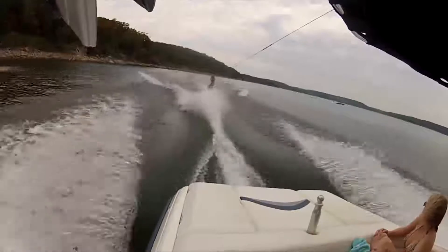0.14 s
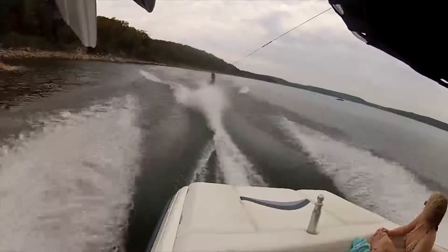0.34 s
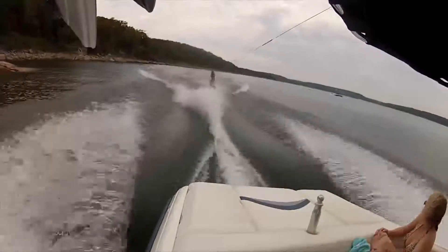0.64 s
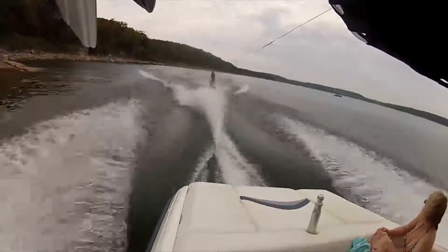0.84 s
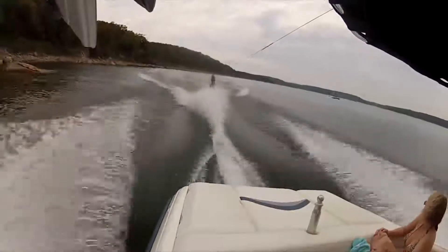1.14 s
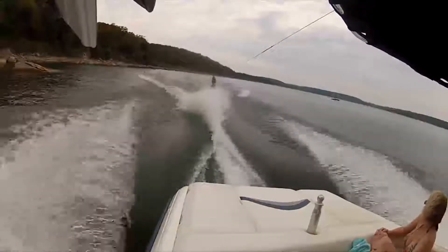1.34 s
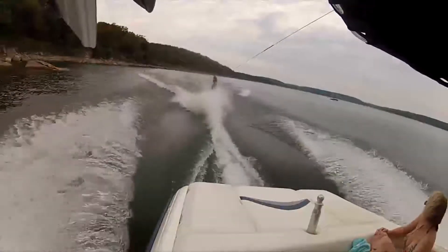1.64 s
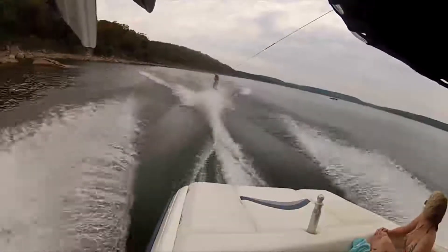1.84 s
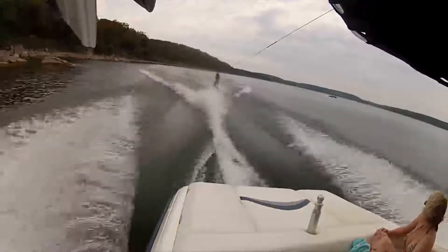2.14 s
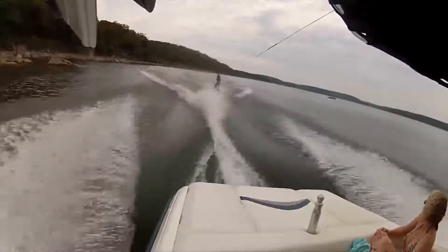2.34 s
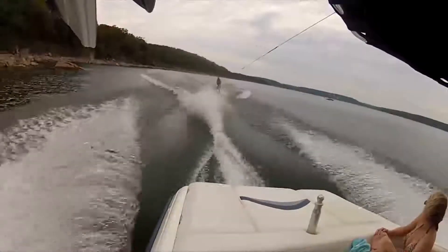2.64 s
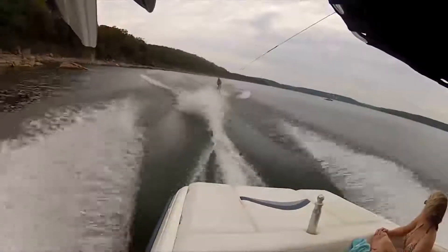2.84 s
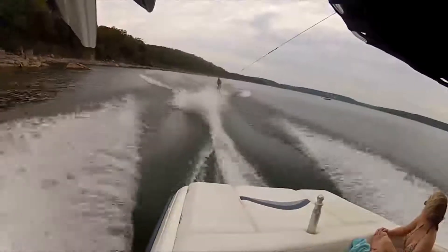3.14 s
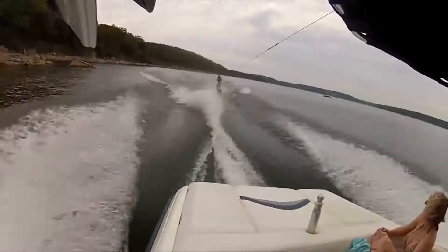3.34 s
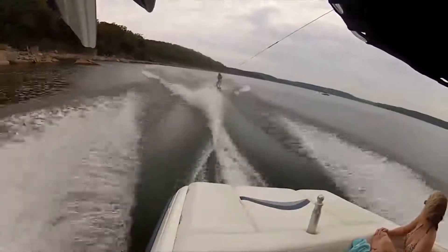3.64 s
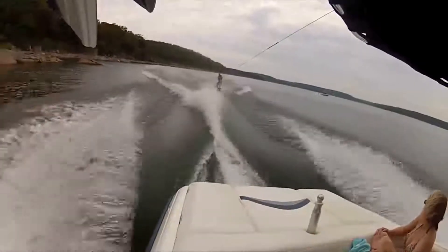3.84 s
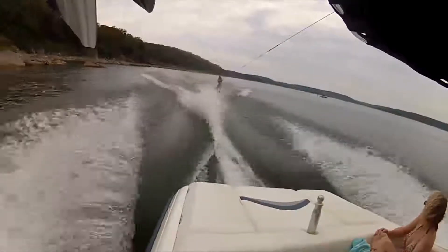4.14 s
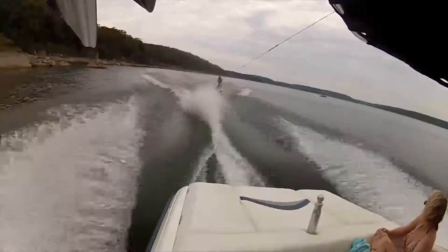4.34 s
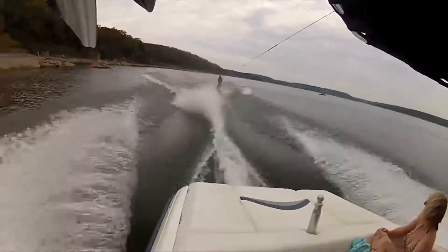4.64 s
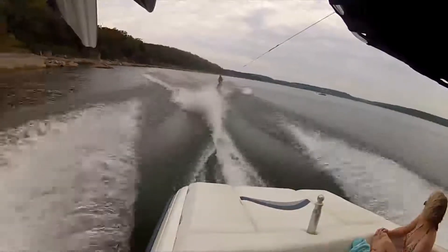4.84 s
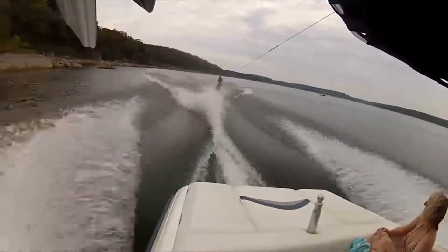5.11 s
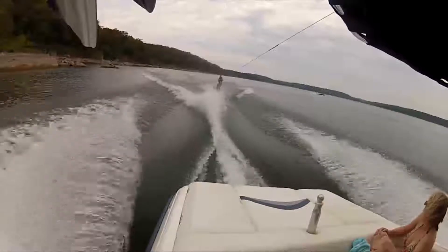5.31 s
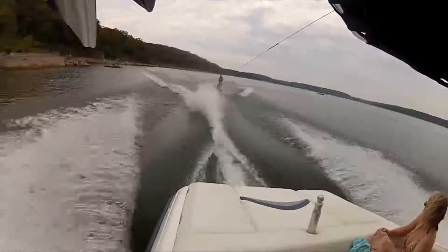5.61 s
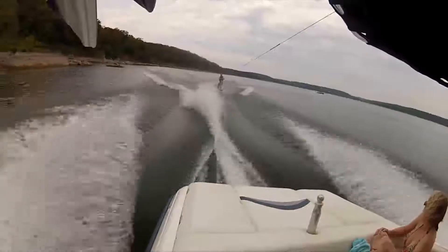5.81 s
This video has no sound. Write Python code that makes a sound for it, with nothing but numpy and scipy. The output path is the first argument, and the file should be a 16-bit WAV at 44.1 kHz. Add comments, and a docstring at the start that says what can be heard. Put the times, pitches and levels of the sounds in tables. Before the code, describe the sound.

A loud, deep drone from a ski boat's engine and shuddering deck continues throughout, picked up by a microphone on the boat. The pitch stays level, while the hum throbs irregularly a few times a second. Churning water makes an even roar underneath, joined by a faint high whine. Small clattering knocks from a loose part come and go as the boat crosses open water.

```python
"""A deck panel booms on an inboard ski boat at towing speed, shaken by turbulent water.
The microphone is in a small camera fixed to the tower, above the cockpit. From below, the four-blade
propeller and the V8 hum through the hull and the gearbox whines. Behind them the wake roars in the
resonances of boat and camera housing, and a loose fitting rattles.
The camera samples slowly and holds each value, which mirrors the treble upward."""
import sys
import numpy as np
from scipy import signal
from scipy.fft import rfft, irfft, next_fast_len
from scipy.io import wavfile
from scipy.ndimage import map_coordinates

SR = 44100
rng = np.random.default_rng(int(sys.argv[2]) if len(sys.argv) > 2 else 0)


def inscribe(sig):
    """Save sig as 16-bit PCM at rate SR to the path in sys.argv[1].

    A 1-D sig is mono; a 2-D sig holds one channel per row.
    Samples are clipped to [-1, 1] before scaling.
    """
    pcm = np.round(np.clip(np.atleast_2d(sig).T, -1, 1) * 32767)
    wavfile.write(sys.argv[1], SR, pcm.astype(np.int16))


N = 263277


def amp(db):
    """Decibels to gain."""
    return 10 ** (np.asarray(db) / 20)


def curve(rows):
    """Straight lines through (time_s, value) rows, one value per sample."""
    return np.interp(np.arange(N) / SR, *np.transpose(rows))


def wobble(rate_hz):
    """A smooth random curve with rate_hz knots a second."""
    coarse = np.arange(0, N + 64, 64)
    knots = rng.standard_normal(int(N / SR + 2) * 60)
    return np.interp(np.arange(N), coarse, map_coordinates(knots, [coarse * rate_hz / SR]))


def filtered(x, response):
    """Shapes the spectrum of x by the gain response(hz)."""
    size = next_fast_len(N + SR // 2)
    return irfft(rfft(x, size) * response(np.fft.rfftfreq(size, 1 / SR)), size)[..., :N]


def resonant_noise(modes, steepness, envelope=1):
    """Noise at rms 1 through unrelated resonances, which add as powers."""
    def response(f):
        powers = (amp(2 * db) / (1 + (2 * (f - hz) / width) ** 2) ** steepness for hz, width, db in modes)
        return np.sqrt(sum(powers))
    noise = filtered(envelope * rng.standard_normal(N), response)
    return noise / np.sqrt(np.mean(noise ** 2))


def tone(turns, level_db, flutter_db, slip_rad):
    """A sine around an rms level, wavering in size and phase."""
    phase = 2 * np.pi * (turns + rng.uniform()) + slip_rad * wobble(6)
    return np.sqrt(2) * amp(level_db + flutter_db * wobble(7)) * np.sin(phase)


# Clear knocks of the loose fitting: start_s, level_db, low_ring_db, high_ring_db
CLEAR_KNOCKS = [(1.4117, -27, -7, -7), (1.479, -19, 0, -3), (1.661, -25, 6, -7), (2.115, -31, -6, -7),
                (2.2767, -24.5, 8, -4), (2.440, -17.5, -4, -4), (2.537, -17, 4, -3), (2.6643, -25.5, 13, 2),
                (2.9337, -23, 6.5, -6), (3.5897, -24.5, 3, -3), (3.666, -20.5, 0, -4),
                (4.166, -17.5, 4, -4), (4.4215, -15.5, -2, -2.5)]
# Modes of the fitting: pitch_hz, level_db, t60_s
FITTING_MODES = [(780, -3.5, 0.051), (890, -1, 0.041), (997, -4.5, 0.024), (1400, -13, .03),
                 (1918, 1, 0.046), (2070, -6, .03), (2276, -3.5, 0.035), (2322, -1.5, 0.036),
                 (2710, -4.5, 0.023), (3100, -10, .015)]
# Contacts within one knock: delay_s, level_db
CONTACTS = [(0, -3), (.0021, -11), (.0105, -8.5)]


def fitting_rattle(chatter_db, spread_db):
    """A loose fitting on board knocks over a faint chatter; each blow and bounce rings it anew."""
    chatter = [(when * N / SR, chatter_db - spread_db * np.log(chance + 1e-3), -2.5, -1.5)
               for when, chance in rng.uniform(size=(150, 2))]
    out = np.zeros(N + SR)
    t = np.arange(SR // 12) / SR
    attack = 1 - np.exp(-t / 0.0014)
    hz, mode_db, t60_s = np.transpose(FITTING_MODES)[:, :, None]
    for start_s, knock_db, low_db, high_db in list(CLEAR_KNOCKS) + chatter:
        colour_db = mode_db + (hz < 1200) * low_db + (hz > 2200) * high_db
        for delay_s, contact_db in CONTACTS:
            scatter, detune = rng.normal(size=(2, len(hz), 1))
            decay = amp(colour_db + 1.5 * scatter - 60 * t / t60_s)
            ring = (decay * np.sin(2 * np.pi * hz * (1 + 0.013 * detune) * t)).sum(axis=0)
            onset = round((start_s + delay_s) * SR)
            out[onset:onset + len(t)] += amp(knock_db + contact_db) * attack * ring
    return out[:N]


# Resonances of the hull, down at the water: pitch_hz, width_hz, relative_db
HULL_MODES = [(8, 20, -27), (36.6, 31, -16), (87.3, 26.5, -2.5), (104, 53, -18), (154, 28, -6.5),
              (238, 19, -7), (252.8, 23.4, -6.5), (282, 56, -14), (322, 44, -19), (365, 30, -26),
              (409, 29, -14.5), (450.5, 17, -16.5), (487.5, 45.6, -9.5), (548, 24, -19), (604, 45, -25.5)]
# Resonances of the cockpit panels, under the tower: pitch_hz, width_hz, relative_db
COCKPIT_MODES = [(709, 31, -8), (771.6, 37, -1.5), (799, 19, -8), (860, 77, -13), (1000, 175, -18),
                 (1100, 86, -21.5)]
# Resonances of the housing, right at the microphone: pitch_hz, width_hz, relative_db
HOUSING_MODES = [(1333, 130, -8), (1666, 420, -9), (1873, 97, -2), (2060, 100, -2), (2353, 230, 1),
                 (2755, 250, -5.5), (3510, 284, -6), (3780, 230, -10.5), (4280, 155, -18), (5020, 440, -13),
                 (5570, 750, -13)]


def wake_roar():
    """Water noise rings in hull, cockpit and housing; the treble flickers very slightly."""
    hull = resonant_noise(HULL_MODES, steepness=1.73)
    cockpit = resonant_noise(COCKPIT_MODES, steepness=1.6)
    flicker_db = 0.45 * wobble(14) + 0.32 * wobble(45)
    housing = resonant_noise(HOUSING_MODES, steepness=1.22, envelope=amp(flicker_db))
    return amp(-21) * hull + amp(-32.5) * cockpit + amp(-37.5) * housing


# Rate at which the gear teeth meet: time_s, pitch_hz
GEAR_MESH = [(0.0, 1081), (0.38, 1078), (0.56, 1086), (0.81, 1093), (1.13, 1083), (1.88, 1081),
             (2.08, 1091), (3.16, 1094), (3.31, 1086), (3.86, 1091), (4.51, 1085), (5.32, 1096),
             (5.47, 1086), (5.97, 1090)]
GEAR_TEETH, CRANK_TURNS_PER_SHAFT_TURN = 34, 1.57


def shaft_turns():
    """Running count of propeller shaft turns, which paces gears, engine and blades."""
    return np.cumsum(curve(GEAR_MESH)) / SR / GEAR_TEETH


def gear_whine(shaft):
    """Meshing teeth make one tone, faint up at the tower."""
    return tone(GEAR_TEETH * shaft, level_db=-42.5, flutter_db=0.9, slip_rad=0.23)


# Engine orders: multiple_of_cycle, level_db
ENGINE_ORDERS = [(2, -34), (3, -36), (6, -31.5), (7, -48), (8, -44.5), (9, -33.5), (10, -28.5), (11, -34.5),
                 (13, -42), (14, -44.5), (16, -33.5), (19, -48), (20, -40), (28, -55)]


def engine_hum(shaft):
    """The V8 down in the hull shakes once per cycle of two crank turns; its firing adds harmonics."""
    cycle = shaft * CRANK_TURNS_PER_SHAFT_TURN / 2
    shake = tone(cycle, level_db=-30.5, flutter_db=1.5, slip_rad=0.3)
    return shake + sum(tone(k * cycle, db, flutter_db=1.2, slip_rad=0.41) for k, db in ENGINE_ORDERS)


# Strength of the blade-rate thrum: time_s, level_db
BLADE_THRUM = [(0.1, -16), (0.18, -18), (0.47, -13.5), (0.66, -18), (1.25, -15), (1.34, -21), (1.47, -14.5),
               (1.57, -15.5), (1.86, -15.5), (1.99, -21), (2.36, -14), (2.55, -20.5), (2.59, -16),
               (3.07, -19), (3.12, -14), (3.2, -19), (3.85, -17), (3.9, -21.5), (4.03, -16.5), (5.9, -17.5)]
# Higher propeller orders: multiple_of_shaft, level_db, flutter_db
PROPELLER_ORDERS = [(8, -28, 3.5), (12, -43, 3), (15, -44.5, -5.5)]


def propeller_thrum(shaft):
    """Under the boat, the shaft shakes once a turn and four blades thrum through the hull."""
    shake = tone(shaft, level_db=-26.5, flutter_db=1.5, slip_rad=0.3)
    blades = tone(4 * shaft, curve(BLADE_THRUM), flutter_db=1.66, slip_rad=0.22)
    overtones = sum(tone(k * shaft, db, flutter, slip_rad=0.32) for k, db, flutter in PROPELLER_ORDERS)
    return shake + blades + overtones


# Booms of the deck panel: crest_s, pitch_hz, crest_rms_db
DECK_BOOMS = [(.13, 107.8, -11), (.43, 100.8, -11.5), (.55, 105, -5), (.68, 105, -11.5), (1.33, 104.9, -11),
              (1.5, 105.7, -7), (1.9, 104.5, -8.5), (2.08, 105.8, -9), (2.25, 100.1, -10),
              (2.72, 101.1, -5), (3.04, 101.5, -11), (3.34, 102.1, -6.5), (3.49, 105.5, -8.5),
              (3.73, 105.1, -10), (3.85, 107.5, -11.5), (4.54, 105.1, -8.5), (4.87, 107, -10),
              (5.13, 107, -10), (5.26, 105, -8.5), (5.51, 106.5, -11.5), (5.81, 105.5, -10.5)]


def deck_boom(pitch_hz, width_hz, shiver_db, swell_s):
    """Below the microphone, turbulent water keeps one panel mode shivering; at times it swells to a boom."""
    t = np.arange(N) / SR
    shiver = amp(shiver_db) * resonant_noise([(pitch_hz, width_hz, 0)], steepness=2.24)
    booms, swelling = np.zeros((2, N))
    for crest_s, hz, db in DECK_BOOMS:
        swell = np.exp(-0.5 * ((t - crest_s) / swell_s) ** 2)
        booms += np.sqrt(2) * amp(db) * swell * np.sin(2 * np.pi * (hz * t + rng.uniform()))
        swelling += swell
    return booms + shiver * (1 - np.clip(swelling, 0, 1))  # the shiver gives way to each boom


def scene():
    """The whole boat in mono, from the one microphone on the tower."""
    background = fitting_rattle(chatter_db=-40.5, spread_db=2.0) + wake_roar()
    shaft = shaft_turns()
    drive = gear_whine(shaft) + engine_hum(shaft) + propeller_thrum(shaft)
    deck = deck_boom(pitch_hz=105.2, width_hz=13.5, shiver_db=-15, swell_s=0.042)
    return (background + drive + deck)[None]


def record(dry):
    """The camera rounds off peaks, samples slowly and holds: the spectrum mirrors around the hold rate."""
    hold_hz, top_hz = 12000, 15290
    limited = dry / (1 + np.abs(dry) ** 14) ** (1 / 14)
    slow = signal.resample_poly(limited, hold_hz, SR, axis=1)
    steps = np.repeat(slow, 4, axis=1)
    held = signal.resample_poly(steps, SR, 4 * hold_hz, axis=1)
    return filtered(held, lambda hz: hz < top_hz)


dry = scene()
out = record(dry)
inscribe(out)
```